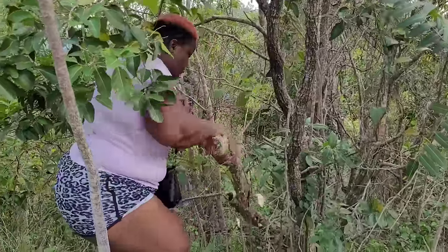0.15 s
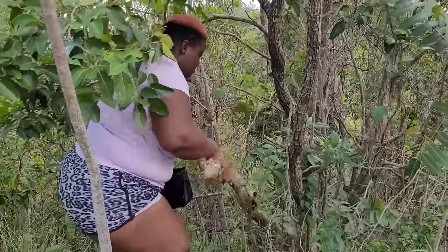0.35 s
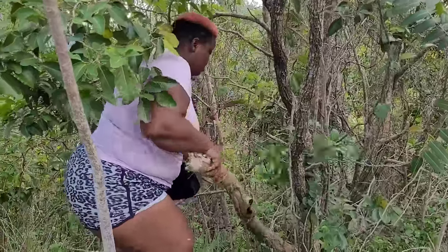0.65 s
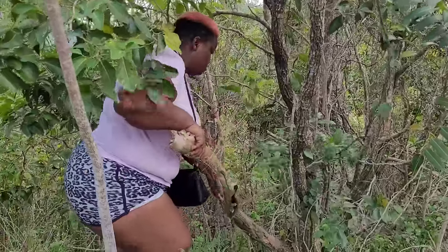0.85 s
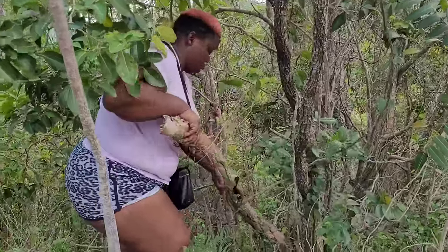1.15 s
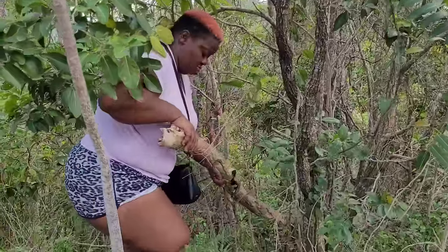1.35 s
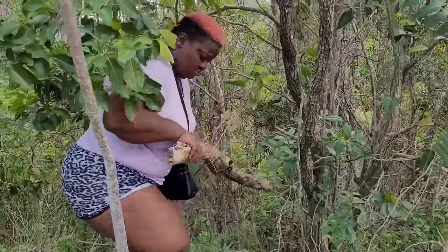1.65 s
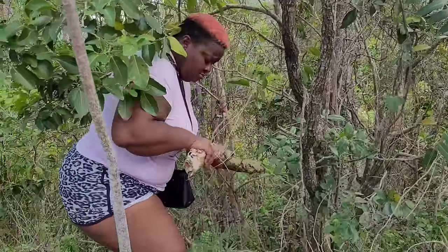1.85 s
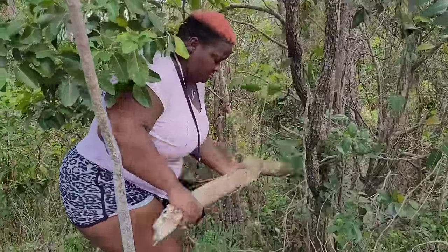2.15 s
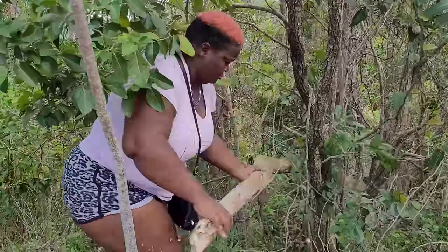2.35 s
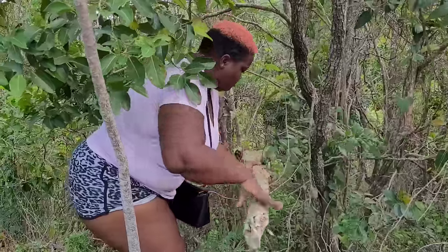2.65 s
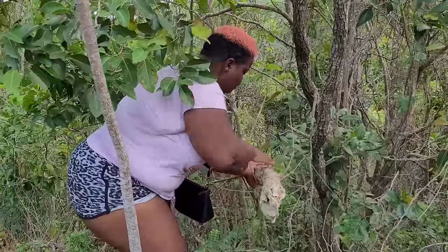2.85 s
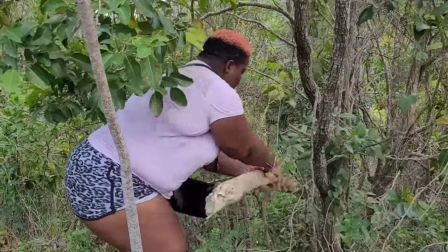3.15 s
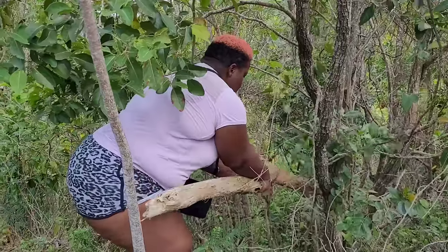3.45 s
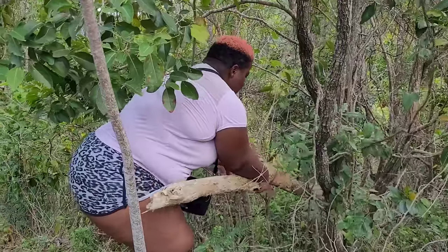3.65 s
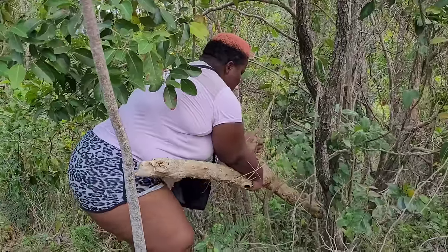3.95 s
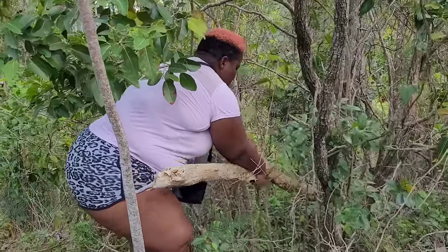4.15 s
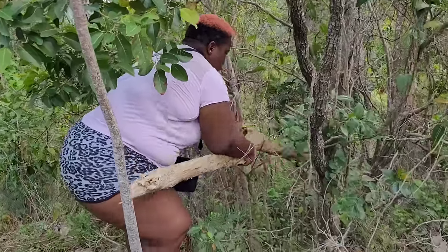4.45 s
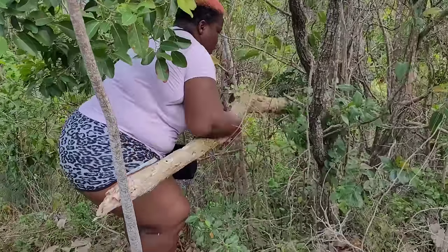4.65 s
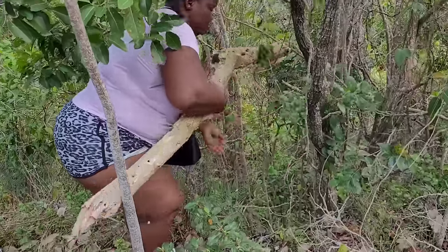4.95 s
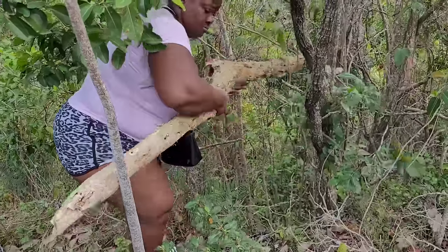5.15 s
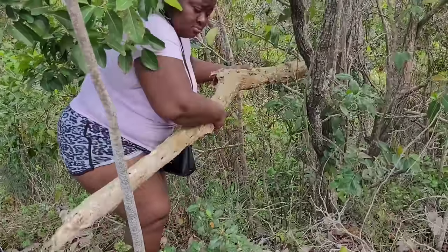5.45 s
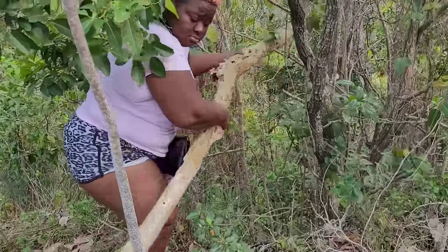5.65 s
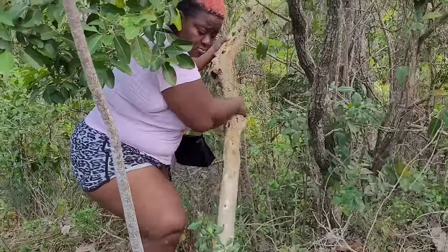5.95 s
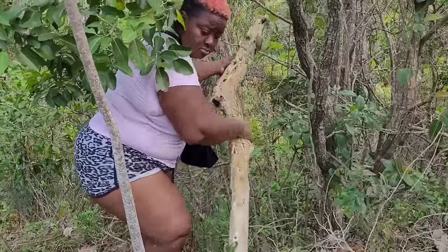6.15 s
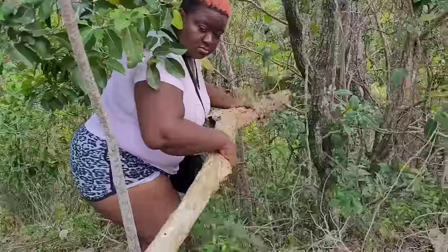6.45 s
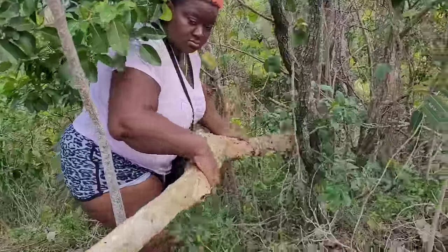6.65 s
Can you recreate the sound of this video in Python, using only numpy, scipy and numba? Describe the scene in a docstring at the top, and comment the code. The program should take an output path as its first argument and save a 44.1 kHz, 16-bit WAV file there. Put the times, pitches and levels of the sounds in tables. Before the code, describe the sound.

Outdoors in scrub woodland, a dead branch is pulled free close by. Leaves crackle at once, two sharp twig snaps follow, then a strong rustle before two seconds. Knocks and smaller cracks come next, thinning to near quiet until a slap through leaves at about four seconds. Rustling builds again to a final loud crunch. Close stereo pickup, dry, with low breeze buffeting.

```python
"""Dry leaves crackle at once, then twigs snap, as a dead branch is tugged out of scrub in several pulls.
Leaves and bark are streams of tiny damped rings; snaps and whips are bursts of jumping noise.
Knocks are decaying wood modes, thuds are low noise, and a short creak is a sinking, rough note.
The thicket scatters most sounds briefly through random echoes; under it all a light breeze,
made of low noise, buffets the microphone and distant foliage hisses."""
import sys
import numpy as np
from scipy import signal
from scipy.fft import rfft, irfft
from scipy.io import wavfile
from scipy.ndimage import uniform_filter1d
from numba import njit

SR = 44100
rng = np.random.default_rng(int(sys.argv[2]) if len(sys.argv) > 2 else 0)


def output_pcm(signal):
    """Save a mono or channel-first signal as 16-bit PCM at the path in sys.argv[1].

    Samples are clipped to [-1, 1] before scaling.
    """
    pcm = np.clip(np.atleast_2d(signal).T, -1, 1) * 32767
    wavfile.write(sys.argv[1], SR, np.round(pcm).astype(np.int16))


N = 300321
TIME = np.arange(N) / SR
# Levels in the event tables are starting points: each function adds its own fixed trim.


def undb(db):
    """Decibels to gain."""
    return 10 ** (np.asarray(db) / 20)


def unit(x):
    """Scale to rms 1."""
    return x / np.sqrt(np.mean(x ** 2))


def fall(t, t60):
    """Exponential decay that drops 60 dB in t60 seconds."""
    return np.exp(-np.log(1000) * t / max(t60, 1e-3))


def band(x, hz, kind):
    """Gentle low-, high- or band-pass."""
    sos = signal.butter(2, np.minimum(hz, SR / 2 - 1), kind, fs=SR, output="sos")
    return signal.sosfilt(sos, x)


def colour(x, points, size=2048):
    """Causal, minimum-phase filter that follows (Hz, dB) points."""
    hz, db = np.transpose(points)
    grid = np.maximum(np.arange(size // 2 + 1) * SR / size, 1)
    gain = undb(np.interp(np.log(grid), np.log(hz), db))
    # folding the cepstrum onto positive time gives minimum phase
    cepstrum = irfft(np.log(gain))
    cepstrum[1:size // 2] *= 2
    cepstrum[size // 2 + 1:] = 0
    response = irfft(np.exp(rfft(cepstrum)))
    return signal.fftconvolve(np.atleast_2d(x), response[None], axes=1)[:, :np.shape(x)[-1]]


def sides(pan_db):
    """Left and right gains for a left-minus-right difference in dB."""
    return undb(np.array([np.atleast_1d(pan_db), -np.atleast_1d(pan_db)]) / 2)


def to_ports(x, count=4):
    """Sound reaches the left port a few samples before the right."""
    return np.array([x, np.r_[np.zeros(count), x[:-count]]])


def strike(x, db, pan_db):
    """Scale a hit by the level of its first 4 ms and place it between the ports."""
    onset_rms = np.sqrt(np.mean(x[:SR // 250] ** 2))
    return to_ports(x / onset_rms) * undb(db) * sides(pan_db)


def add(track, s, sound):
    """Mix a stereo sound in at a time in seconds."""
    start = int(np.clip(s * SR, 0, N - 1))
    track[:, start:start + sound.shape[1]] += sound[:, :N - start]


def swells(table, rise_shares, t60, rest_db):
    """Each row rises, holds and dies away over a resting level; one dB curve for each level column."""
    power = undb(rest_db)[:, None] ** 2
    for s, length, *db in table:
        rise_s = length * np.clip(rise_shares, .05, 1)[:, None]
        rise = np.clip((TIME - s) / rise_s, 0, 1)
        release = fall(np.maximum(TIME - s - length, 0), t60)
        power = power + (undb(db)[:, None] * rise * release) ** 2
    return 10 * np.log10(power)


def waver(per_s):
    """Smooth random curve through per_s points a second, with a spread of 1."""
    return unit(np.interp(TIME * per_s, np.arange(N), rng.standard_normal(N)))


@njit
def ring(starts, lags, poles, sizes):
    """Each grain is a damped oscillation that reaches the right port with its own lag."""
    out = np.zeros((2, N + 2048))
    for k in range(len(starts)):
        z = sizes[k] + 0j
        for i in range(starts[k], starts[k] + min(2000, int(-5 / np.log(abs(poles[k]))))):
            z *= poles[k]
            out[0, i] += z.imag
            out[1, i + lags[k]] += z.imag
    return out[:, :N]


def crackle(per_s, low_hz, high_hz, cycles, spread_db, lag_spread, size=2600):
    """Tiny fractures at random moments, each with its own pitch, strength and direction; steady in level."""
    starts = np.flatnonzero(rng.random(N) < per_s / SR)
    pitch, strength, place = rng.random((N, 3))[starts].T
    hz = low_hz + pitch * (min(high_hz, SR / 2) - low_hz)
    poles = np.exp((2j * np.pi - 1 / cycles) * hz / SR)  # amplitude falls to 1/e in this many cycles
    sizes = undb(-spread_db * np.log(np.maximum(strength, .004))) * np.sqrt(hz)
    lags = np.round(4 + lag_spread * (2 * place - 1)).astype(np.int64)  # samples
    grains = ring(starts, lags, poles, sizes)
    running_power = uniform_filter1d(np.mean(grains ** 2, axis=0), size=size)
    return grains / np.sqrt(running_power + 1e-6)


def splinters(count, size=16):
    """Noise whose strength jumps from one tiny break to the next, every size samples."""
    strength_db = np.repeat(rng.uniform(-7, 7, count // size + 1), size)[:count]
    return rng.uniform(-0.99, 1, count) * undb(strength_db)


# The pulls on the branch, each dragging it a little further. Each row: start in seconds, length in
# seconds, leaf rustle in dB, stalk crunch in dB, bark scrape in dB.
TUGS = [(-0.06, 0.12, -44.5, -47.5, -58.5), (0.105, 0.15, -38, -45.5, -50), (0.33, 0.11, -43.5, -46.5, -51),
        (0.49, 0.063, -45.5, -53, -49.5), (0.575, 0.25, -46, -50.5, -51.5), (0.865, 0.18, -45.5, -49, -49),
        (1.17, 0.1, -58, -59, -59), (1.39, 0.09, -55, -59, -69), (1.545, 0.27, -36, -40.5, -47.5),
        (1.98, 0.017, -50, -54, -61), (2.1, 0.13, -42, -45.5, -48.5), (2.24, 0.14, -44, -43, -48),
        (2.39, 0.14, -48.5, -52.5, -55.5), (2.55, 0.25, -54, -62.5, -62.5), (2.86, 0.15, -57, -65, -85),
        (3.02, 0.11, -55, -54, -59), (3.17, 0.13, -59.5, -62, -65.5), (3.505, 0.081, -56, -58.5, -60.5),
        (3.69, 0.033, -52.5, -57.5, -69), (3.84, 0.22, -71, -70, -72), (4.37, 0.032, -53, -61, -67),
        (4.44, 0.13, -63, -64, -65), (4.57, 0.23, -53, -54, -56), (4.825, 0.037, -48, -48, -66),
        (4.9, 0.28, -47, -48.5, -51.5), (5.22, 0.26, -47.5, -52, -57.5), (5.51, 0.054, -50, -56, -56),
        (5.6, 0.31, -52, -58, -63), (5.94, 0.27, -52, -53.5, -78), (6.08, 0.14, -42, -44, -50),
        (6.215, 0.26, -39, -41.5, -46), (6.56, 0.17, -43.5, -45.5, -51), (6.65, 0.12, -38, -41, -44.5)]
# Stirring between pulls, in dB: leaves, stalks, bark.
TUG_REST_DB = [-66, -66.5, -65.5]
# Share of a pull over which each builds up: leaves, stalks, bark. The bark bites last.
TUG_RISE_SHARES = [0.5, 0.48, 0.7]


def tugs():
    """Level curves of leaves, stalks and bark: the branch catches and slips, so effort is never even."""
    settle_t60_s, catch_db, catch_per_s = 0.64, 0.97, 22
    effort_db = swells(TUGS, TUG_RISE_SHARES, settle_t60_s, TUG_REST_DB)
    return effort_db + catch_db * waver(catch_per_s)


def flutter(x):
    """After each crinkle the dry blade shivers for a moment: noise that follows the fading energy."""
    pole = fall(1 / SR, .022)
    energy = signal.lfilter([1 - pole], [1, -pole], np.mean(x ** 2, axis=0))
    return rng.standard_normal((2, N)) * np.sqrt(energy)


# Tone of the dry foliage. Each row: frequency in Hz, gain in dB.
LEAF_COLOUR = [(760, -29.5), (1300, -16.5), (1530, -11), (1980, -15.5), (2860, -4.5), (5070, -5.5),
               (6550, -8), (7110, -6), (8720, -7.5), (12300, -5), (15000, -9.5)]


def leaves(leaf_db, stalk_db):
    """Dry leaves crinkle, more of them at once in a harder pull; thin stalks tick among them."""
    per_s = 2000 * undb(.5 * (np.clip(leaf_db, -65, -30) + 51.0))
    grains = crackle(per_s, low_hz=1240, high_hz=16900, cycles=1.0, spread_db=3, lag_spread=4, size=3400)
    stalks = crackle(170, low_hz=1130, high_hz=5800, cycles=0.68, spread_db=3, lag_spread=5.6, size=9000)
    shiver = flutter(grains)
    rustle = colour(grains + undb(-9.5) * stalks + undb(10.0) * shiver, LEAF_COLOUR)
    # split without delay at two corners, so that the three bands can be balanced
    below_body = signal.sosfiltfilt(signal.butter(4, 2500, fs=SR, output="sos"), rustle)
    below_treble = signal.sosfiltfilt(signal.butter(4, 8500, fs=SR, output="sos"), rustle)
    # thick stalks give the low crunch, thin leaf edges the treble
    crunch = unit(below_body) * undb(stalk_db - 3.5)
    body = unit(below_treble - below_body) * undb(leaf_db - 1.0)
    treble = unit(rustle - below_treble) * undb(leaf_db - 1.7)
    return (crunch + body + treble) * sides(pan_db=-1.5)


def ticks(leaf_db):
    """The nearest brittle leaf edges break with single dry ticks that reach the ports directly."""
    grains = crackle(130, low_hz=2500, high_hz=14000, cycles=.9, spread_db=2.5, lag_spread=3, size=22000)
    return band(grains, 1800, "high") * undb(leaf_db - 13)


# Stiff leaves that drag over the bark. Each row: middle in seconds, length in seconds, level in dB,
# lower resonance in Hz, upper resonance in Hz.
DRAGS = [(0.168, 0.22, -55, 3080, 7100), (1.666, 0.17, -38.5, 3170, 6800), (1.792, 0.069, -36, 2350, 6700),
         (6.682, 0.093, -33, 2440, 4230)]


def drags():
    """A stiff leaf chatters over the bark and rings in two broad resonances, off to the right."""
    chatter = crackle(6200, low_hz=1490, high_hz=8850, cycles=1.0, spread_db=4.5, lag_spread=9.2)
    out = 0
    for s, length, db, hz, upper_hz in DRAGS:
        swell = np.cos(np.pi * np.clip((TIME - s) / length, -.5, .5))
        lower = unit(band(chatter, [hz / 1.133, hz * 1.1], "band"))
        upper = unit(band(chatter, [upper_hz / 1.16, upper_hz * 1.12], "band"))
        out = out + (lower + undb(2.5) * upper) * swell * undb(db - 3.5)
    return out * sides(pan_db=-6.0)


# Tone of the scraping bark. Each row: frequency in Hz, gain in dB.
BARK_COLOUR = [(59, -51), (100, -40), (183, -17.5), (350, -3.5), (412, -6.5), (681, -7), (811, 0),
               (1270, -2), (1520, -11), (2000, -32), (2600, -10), (4400, -120)]


def bark(scrape_db):
    """Bark catches and slips in the litter: coarse, woody grains."""
    grains = crackle(1000, low_hz=125, high_hz=2520, cycles=0.56, spread_db=0.0, lag_spread=6.5)
    return unit(colour(grains, BARK_COLOUR)) * undb(scrape_db - 1.0) * sides(pan_db=-2.5)


# Twigs that snap. Each row: start in seconds, level in dB, ring in Hz, crack treble in dB,
# fall time t60 in seconds, left minus right in dB.
SNAPS = [(0.2921, -15, 3940, -9.5, 0.017, -4.5), (0.3426, -16, 2710, -10, 0.062, -1.5),
         (0.5118, -32.5, 2650, 3, 0.024, 15), (0.797, -21.5, 4630, -4, 0.033, 0.5),
         (0.8825, -29, 3130, -5, 0.078, 4), (1.2482, -33.5, 4380, -16, 0.031, -7),
         (2.0675, -28, 3190, -25, 0.025, -2.5), (2.4371, -30.5, 2780, -25, 0.026, 1),
         (2.234, -22.5, 4900, 12, 0.014, 7.5), (2.8546, -31.5, 2660, -18, 0.047, -7),
         (2.8828, -33, 5840, -4, 0.027, -5.5), (2.9533, -43.5, 3150, -15, 0.025, -17),
         (3.5109, -38, 3000, -9, 0.023, -3), (4.151, -47, 5400, -7, 0.017, 15),
         (5.012, -27, 3260, -8, 0.025, -4), (5.111, -31, 3100, -31, 0.025, 9),
         (5.307, -28.5, 3530, -37, 0.028, -2.5), (5.8619, -38.5, 4880, -12, 0.01, 19.5),
         (6.059, -31, 4800, -14, 0.024, 11.5), (6.6642, -18, 4070, -19.5, 0.014, -2),
         (6.6944, -29, 2380, 7, 0.022, 2), (6.7014, -25, 2940, 9, 0.016, 7),
         (6.786, -26, 3210, -12, 0.011, 2)]


def snaps():
    """A first sharp break, then fibres tear in a quick run; the twig rings briefly under the crack."""
    out, t = np.zeros((2, N)), TIME[:SR // 8]
    for s, db, hz, treble_db, t60, pan_db in SNAPS:
        tear = splinters(len(t)) * (fall(t, t60) + fall(t, 0.0038))
        twig = unit(band(tear, [hz / 1.1, hz * 1.087], "band"))
        # green twigs crack dully, dry ones right up into the treble
        crack_colour = [(350, -21.0), (1000, -6.5), (4500, 6.5),
                        (8000, treble_db + 13), (15000, treble_db + 11)]
        crack = unit(colour(tear, crack_colour)[0])
        add(out, s, strike(undb(-8) * twig + crack, db - 6.5, pan_db))
    return out


# The branch knocks on stems and ground. Each row: start in seconds, level in dB, favoured ring in Hz,
# bark click in dB, left minus right in dB.
KNOCKS = [(0.415, -36.5, 1250, -8, 3), (0.51, -42.5, 950, -0.5, 15.5), (0.55, -42.5, 1100, -3, 15),
          (0.592, -41.5, 1110, -13, 2), (1.275, -39.5, 990, -1, -6), (2.161, -35.5, 1240, -5, 11.5),
          (2.186, -35, 1150, -16, -1), (2.283, -33.5, 880, -3, 5), (2.352, -36.5, 800, -4, 10),
          (2.483, -41.5, 1230, 1, 9), (3.067, -50.5, 1220, -22, 10), (3.133, -43, 910, -12, 9),
          (3.428, -45, 1050, -30, 9), (4.151, -48.5, 890, -10, 8), (4.2, -31, 1250, -6, 12),
          (4.971, -47, 1160, 3, 17), (5.111, -40, 1490, -14, 13), (6.196, -36, 1020, -12, -2),
          (6.375, -32.5, 1600, 6, 5), (6.46, -34, 1470, -2, -2), (6.478, -34, 1450, -5, -5),
          (6.726, -39, 1060, -15, 3)]
# Modes of the branch. Each row: frequency in Hz, level in dB, fall time t60 in seconds.
WOOD_MODES = [(340, -11, 0.061), (614, -14, 0.089), (790, -39, 0.054), (882, 10, 0.025), (1130, 4, 0.055),
              (1257, 0.5, 0.051), (1456, 6, 0.055), (2050, 13, 0.039)]


def knocks():
    """Each contact jolts the branch's modes; where it lands decides which rings most."""
    out, t = np.zeros((2, N)), TIME[:SR // 8]
    for s, db, hz, click_db, pan_db in KNOCKS:
        wood = 0
        for (mode_hz, mode_db, t60), chance in zip(WOOD_MODES, rng.random(len(WOOD_MODES))):
            # modes lose 20 dB per octave away from the favoured ring
            weight = undb(mode_db - 20 * abs(np.log2(mode_hz / hz)))
            detuned_hz = mode_hz * (1 + 0.17 * (chance - .5))
            wood = wood + weight * np.cos(2 * np.pi * detuned_hz * t) * fall(t, t60)
        wood = band(wood, 470, "high")  # the knocks carry little bass
        click = band(rng.standard_normal(len(t)) * fall(t, 0.014), [1500, 8000], "band")
        add(out, s, strike(unit(wood) + undb(click_db + 0.5) * unit(click), db + .5, pan_db))
    return out


# Sprigs that slip free and whip through the leaves. Each row: start in seconds, level in dB,
# woody body in dB, fall time t60 in seconds, left minus right in dB.
WHIPS = [(1.248, -32, -20, 0.23, -1), (3.277, -32, -14, 0.051, -5), (4.198, -23, -17.5, 0.2, 1.5),
         (4.387, -37, -17, 0.26, -5), (4.546, -36.5, -25.5, 0.12, 12.5)]
# Tone of a slapping sprig. Each row: frequency in Hz, gain in dB.
WHIP_COLOUR = [(80, -20), (160, -25), (300, -4.5), (550, -1.5), (900, -3.5), (1250, 2.5), (1550, 4.5),
               (2200, -8.5), (3900, -3), (6500, -11), (11000, -9), (15500, -15)]


def whips():
    """A freed sprig slaps the foliage: a dense burst of contacts that dies away."""
    out, t = np.zeros((2, N)), TIME[:SR // 4]
    for s, db, body_db, t60, pan_db in WHIPS:
        contacts = splinters(len(t), size=48)
        swell = (fall(t, t60) + 1.1 * fall(t, 0.052)) * (1 - np.exp(-t / 0.00075))
        slap = colour(contacts * swell, WHIP_COLOUR)[0]
        leafy = unit(band(slap, 3100, "high"))
        woody = unit(band(slap, [170, 1800], "band"))
        add(out, s, strike(leafy + undb(body_db + 10.5) * woody, db - 9.5, pan_db))
    return out


def creak(s=5.07, length=0.185, start_hz=570, end_hz=520, db=-61):
    """Wood binds on wood for a moment and gives a faint, rough, sinking note."""
    count = int(length * SR)
    wobble = .04 * unit(band(rng.standard_normal(N), 150, "low"))[:count]
    hz = np.linspace(start_hz, end_hz, count) * (1 + wobble)
    phase = 2 * np.pi * np.cumsum(hz) / SR
    note = np.sin(phase) + .35 * np.sin(2 * phase) + .35 * np.sin(3 * phase)
    out = np.zeros((2, N))
    add(out, s, to_ports(unit(note * np.hanning(count) ** .5)) * undb(db))
    return out


# Weight presses into the soft ground. Each row: start in seconds, level in dB.
THUDS = [(1.275, -49), (1.709, -44), (2.187, -46), (2.346, -36), (2.39, -49), (4.195, -54), (4.967, -42.5)]


def thuds(t60=0.13):
    """Soil and damp litter give way with a dull thud: low noise with a soft onset."""
    out, t = np.zeros((2, N)), TIME[:SR // 4]
    for s, db in THUDS:
        soil = unit(band(rng.standard_normal(len(t)), [130, 290], "band"))
        thud = soil * fall(t, t60) * (1 - np.exp(-t / 0.0061))
        add(out, s, to_ports(thud) * undb(db - 7.5))
    return out


def thicket(x, near_db, near_t60, far_db, far_t60, size=2048):
    """Stems scatter sound within milliseconds, trees behind add a faint tail; paths change as the bush moves."""
    t = TIME[:3 * size]
    near = fall(t, near_t60) * (t > .0004)
    far = fall(t, far_t60) * (t > .008)
    shape = np.hypot(undb(near_db) * unit(near), undb(far_db) * unit(far)) / np.sqrt(len(t))
    padded = np.pad(x, ((0, 0), (0, 2 * size)))
    window = np.sqrt(np.hanning(2 * size))  # overlapping blocks keep constant power
    out = x.copy()
    for start in range(0, N, size):
        paths = rng.standard_normal((2, len(t))) * shape
        block = padded[:, start:start + 2 * size] * window
        add(out, start / SR, signal.fftconvolve(block, paths, axes=1))
    return out / np.sqrt(1 + np.sum(shape ** 2))


# Puffs of breeze on the microphone. Each row: start in seconds, length in seconds, level in dB.
GUSTS = [(-0.1, 0.84, -63.5), (0.8, 0.3, -56.5), (1.06, 0.055, -48.5), (1.16, 0.027, -49.5),
         (1.27, 0.024, -50.5), (1.385, 0.037, -44.5), (1.48, 0.12, -52), (1.64, 0.21, -65.5),
         (2.175, 0.043, -57.5), (2.36, 0.064, -56.5), (2.42, 0.41, -66), (2.96, 0.023, -66.5),
         (3.36, 0.071, -61), (3.78, 0.073, -66), (4.92, 0.17, -76), (5.625, 0.086, -55.5),
         (6.25, 0.17, -62), (6.66, 0.12, -65)]
# Tone of the buffeting. Each row: frequency in Hz, gain in dB.
BUFFET_COLOUR = [(15, -19), (32, -3), (56, 7), (80, -5.5), (130, -18.5), (300, -26.5), (900, -101)]


def breeze():
    """Eddies buffet each port separately, the left one most."""
    rise_share, fall_t60_s, calm_db = 0.37, 0.26, -87
    gust_db, = swells(GUSTS, [rise_share], fall_t60_s, [calm_db])
    eddies = unit(colour(rng.standard_normal((2, N)), BUFFET_COLOUR, size=16384))
    eddies /= np.sqrt(uniform_filter1d(eddies ** 2, size=5000, axis=1))  # even out before the gusts
    return eddies * undb(gust_db) * sides(pan_db=2.0)


# Tone of the distant foliage. Each row: frequency in Hz, gain in dB.
AIR_COLOUR = [(71, -67), (120, -26), (204, -42), (288, -6), (598, -28), (917, 4), (1870, -23), (3240, -1.5),
              (12100, -4), (15500, -41)]


def air():
    """Distant foliage hisses softly all round: steady noise, independent at each port."""
    return unit(colour(rng.standard_normal((2, N)), AIR_COLOUR)) * undb(-66)


def scene():
    """Rustle from inside the bush, hits from its edge, breeze and distant hiss."""
    leaf_db, stalk_db, scrape_db = tugs()
    foliage = leaves(leaf_db, stalk_db) + drags()
    rustle = thicket(foliage, near_db=-8.5, near_t60=0.022, far_db=-12.5, far_t60=0.039)
    scrape = thicket(bark(scrape_db) + creak(), near_db=-4.5, near_t60=0.055, far_db=-16, far_t60=0.058)
    cracks = thicket(snaps(), near_db=-7, near_t60=.02, far_db=-10, far_t60=.1)
    blows = thicket(knocks() + whips(), near_db=4.0, near_t60=0.04, far_db=-8.5, far_t60=0.24)
    return rustle + ticks(leaf_db) + scrape + cracks + blows + thuds() + breeze() + air()


# The two microphone ports colour the sound differently. Each row: frequency in Hz, left minus right in dB.
PORTS = [(120, 12.5), (300, 4), (550, 1.5), (1000, 3), (1600, 1), (2700, -4), (4500, -2), (6200, -3),
         (7300, -8.5), (8800, 3), (12500, 0), (15000, 0.5)]


def record(dry):
    """Each port adds its own colour; a steep low-pass cuts the top."""
    top_hz = 15600
    left = colour(dry[0], [(hz, db / 2) for hz, db in PORTS])
    right = colour(dry[1], [(hz, -db / 2) for hz, db in PORTS])
    low_pass = signal.ellip(10, .2, 80, top_hz, fs=SR, output="sos")
    return signal.sosfilt(low_pass, np.vstack([left, right]))


dry = scene()
out = record(dry)
output_pcm(out)
```